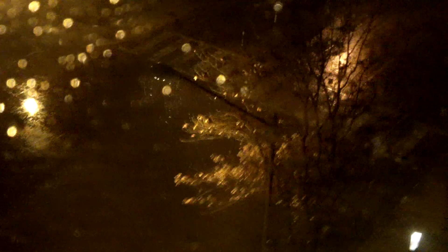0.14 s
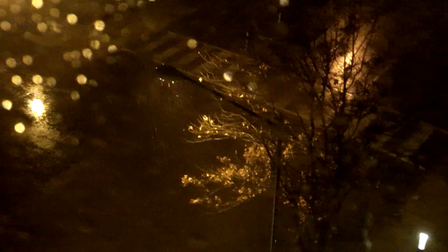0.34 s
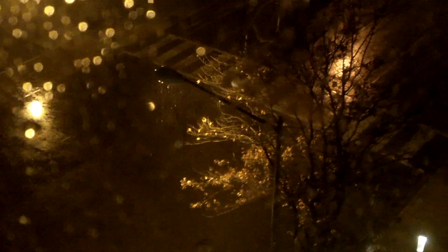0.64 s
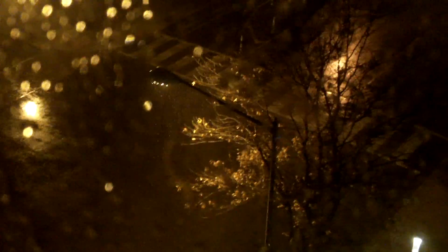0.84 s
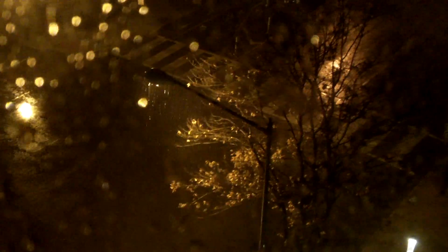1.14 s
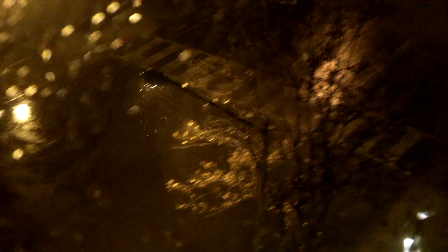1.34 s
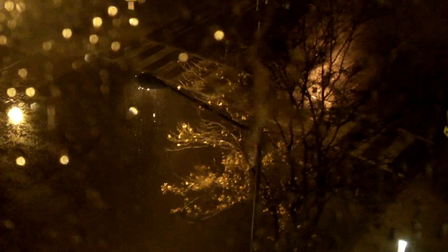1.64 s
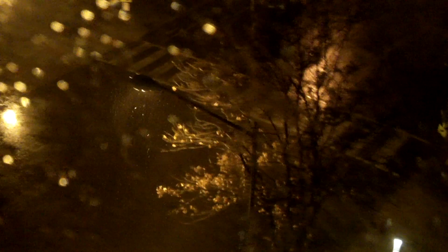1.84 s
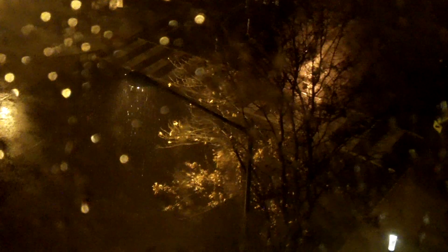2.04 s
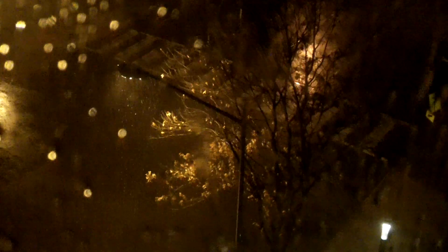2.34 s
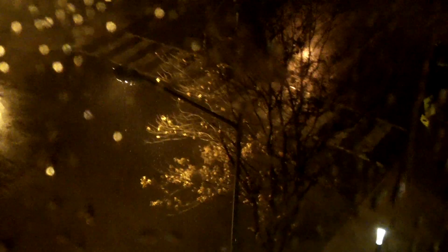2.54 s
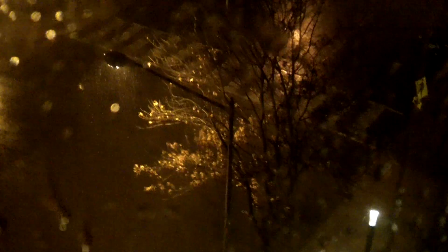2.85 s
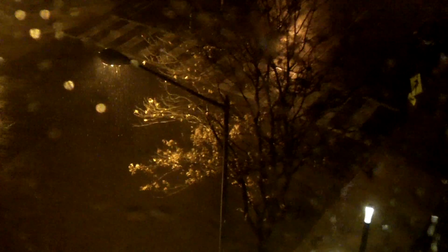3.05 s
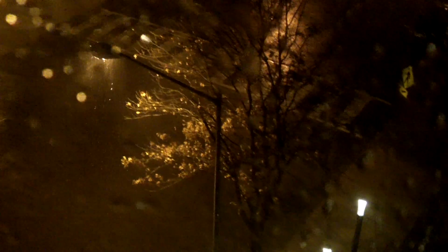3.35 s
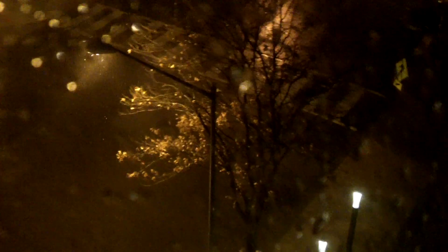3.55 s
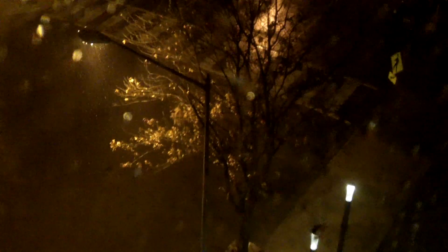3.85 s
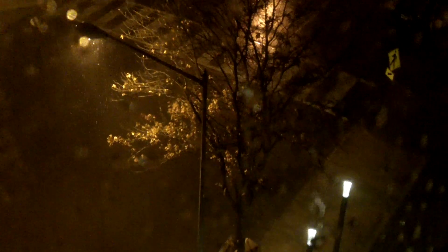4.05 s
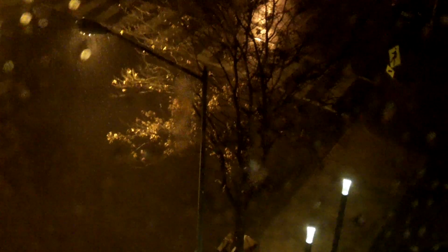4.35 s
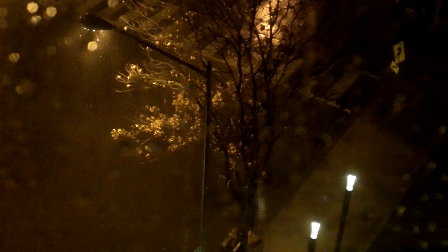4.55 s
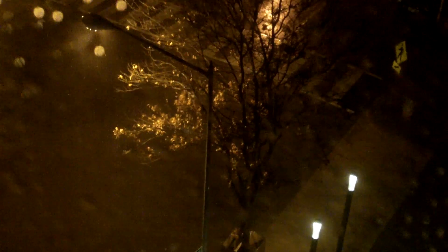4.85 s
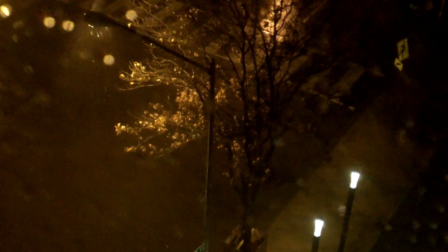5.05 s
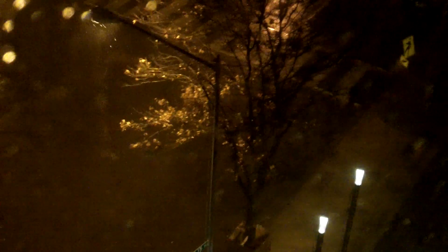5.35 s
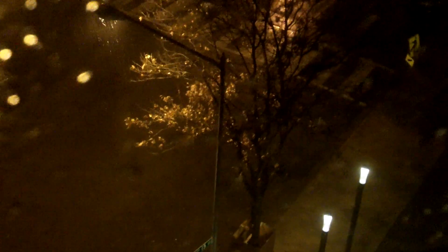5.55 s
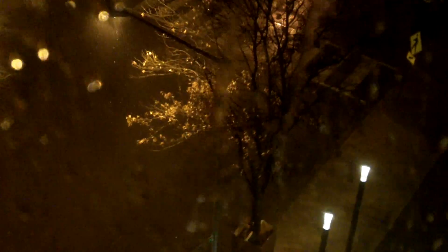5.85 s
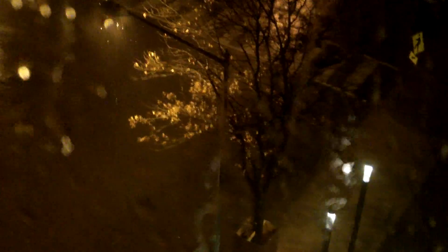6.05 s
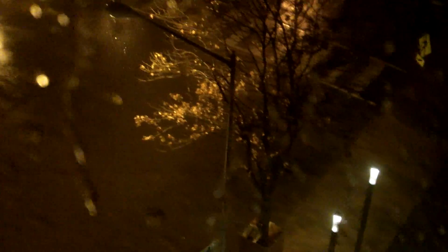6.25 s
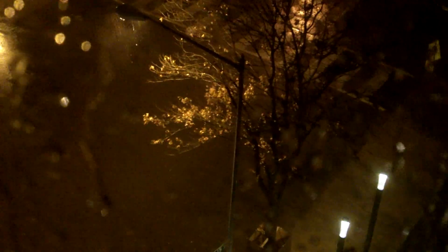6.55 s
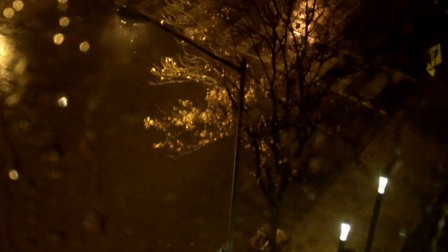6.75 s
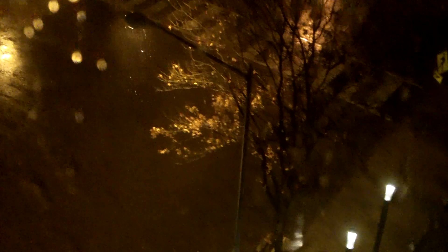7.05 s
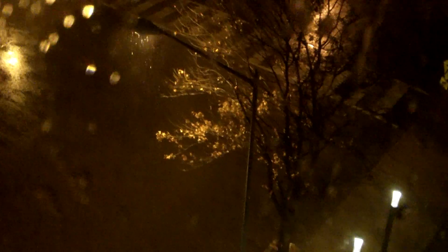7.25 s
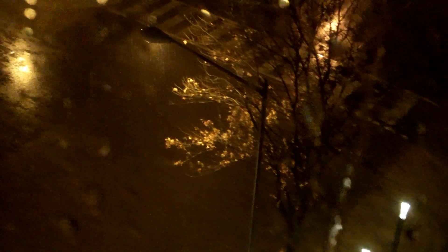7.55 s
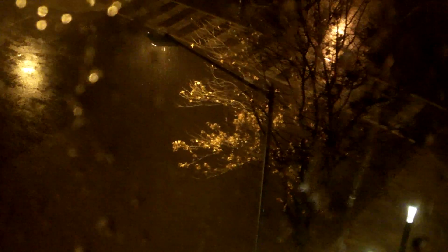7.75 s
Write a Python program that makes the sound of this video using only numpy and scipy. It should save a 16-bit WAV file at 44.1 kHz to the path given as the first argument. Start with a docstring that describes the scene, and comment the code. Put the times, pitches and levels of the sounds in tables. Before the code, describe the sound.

From just inside a closed window above a wet, lamp-lit street, muffled rain keeps pattering without a break. Small quick surges vary its strength, while fat drops tap the pane at uneven intervals and slightly different pitches, quickly damped. A far, low wind swells a little late on, and very quiet hum and hiss sit behind. The close microphone gives a centred image.

```python
"""Rain patters dully on a window at night, heard from indoors close to the glass, with heavier taps among it.
Noise bursts and short tones, filtered by the pane, make the patter; brighter noise makes the fine spray.
Each heavy drop rings damped pane modes and throws a burst of patter. Wind is shaped noise: the pane flexing
below hearing, a rumble in the frame and a far roar. Faint tones waver underneath. One microphone feeds both
channels, with amplifier hiss, low noise and a tone opposite in left and right, and a steady offset."""
import sys
import numpy as np
from scipy import signal
from scipy.fft import rfft, irfft, next_fast_len
from scipy.io import wavfile
from scipy.ndimage import map_coordinates

SR = 44100
rng = np.random.default_rng(int(sys.argv[2]) if len(sys.argv) > 2 else 0)


def wav_record(signal):
    """Record a signal, one row per channel, as 16-bit PCM in the file named by sys.argv[1]."""
    frames = np.transpose(np.atleast_2d(signal))
    bounded = np.clip(frames, -1, 1)
    # unit amplitude maps onto the largest positive 16-bit level
    quanta = np.round(bounded * 32767).astype(np.int16)
    wavfile.write(sys.argv[1], SR, quanta)


N = 348390  # length in samples

# Spectra give relative levels, since each noise is later scaled as a whole.
# Patter strength before flurries and splashes: start_s, level_db
PATTER_LEVEL = [(0.0, -46.5), (0.34, -45.5), (0.52, -47.5), (0.7, -43.0), (0.81, -47), (1.23, -44),
                (1.31, -49), (1.57, -44), (2.17, -48.5), (2.65, -46.0), (2.73, -50.5), (3.01, -46.5),
                (3.11, -49.5), (3.45, -44), (3.94, -48.0), (4.19, -45), (4.66, -49), (4.75, -46),
                (5.53, -48), (5.84, -44.5), (6.38, -48), (6.48, -45), (6.61, -48.5), (6.91, -45.0),
                (7.35, -49.5), (7.46, -45.5), (7.76, -50.5), (7.89, -48.0)]
# Heavy drops, with the nominal level that sets their ring and splash: start_s, level_db, centre_hz
HEAVY_DROPS = [(0.219, -33, 1010), (0.279, -28.5, 807), (1.008, -32.5, 1220), (1.392, -29.5, 1090),
               (1.582, -29.5, 1410), (1.658, -33, 754), (1.809, -30, 961), (1.861, -36, 926),
               (2.192, -31, 762), (2.44, -34, 883), (2.618, -31, 815), (2.842, -36, 1140), (3.01, -31, 920),
               (3.151, -29, 940), (3.404, -34.5, 493), (3.608, -43.5, 912), (3.719, -37.5, 611),
               (4.036, -35, 1100), (4.307, -32, 1210), (4.521, -39, 536), (4.938, -32.5, 1180),
               (5.05, -31.5, 674), (5.388, -36.5, 915), (5.538, -27.5, 549), (5.631, -33.5, 554),
               (5.836, -34, 880), (5.857, -32.5, 1010), (6.049, -32, 1030), (6.287, -30.5, 993),
               (6.799, -36.5, 1010), (7.212, -39, 880), (7.393, -38, 762), (7.452, -32, 606),
               (7.863, -30.5, 1030)]
# Transmission of the pane: frequency_hz, level_db_per_hz
PANE_TRANSMISSION = [(180, -45.5), (300, -8.5), (485, -3.5), (753, -1.5), (865, -2), (1000, 1), (1090, -6),
                     (1220, -4.5), (1330, -7.5), (1540, -4), (2100, -29.5), (2730, -54.5), (4620, -120)]
# Resonant modes of the pane: frequency_hz, width_hz, lift_db
PANE_MODES = [(466, 76, -0.5), (514, 190, 2.5), (645, 50, 2.5), (770, 85, 3), (894, 50, 3), (1026, 26, 3.5),
              (1090, 41, 3.5), (1214, 204, 6), (1389, 100, 4), (1590, 70, 1.5)]
# Spectrum of the fine spray: frequency_hz, level_db_per_hz
SPRAY_SPECTRUM = [(1060, -28.5), (1800, -6.5), (2170, -16), (2760, -19), (3050, -25), (3960, -47.5),
                  (6710, -120)]
# Slow flexing of the pane under gust pressure: start_s, level_db
FLEX_LEVEL = [(0, -52), (.35, -45), (.9, -47), (1.15, -54), (1.6, -41.5), (1.9, -48), (2.3, -45),
              (2.7, -54), (3.2, -50), (4, -50), (4.3, -57), (5.5, -55), (6, -55), (7.9, -57)]
# Spectrum of the flexing: frequency_hz, level_db_per_hz
FLEX_SPECTRUM = [(.7, -18), (3.4, -7), (7.4, 0), (8.7, -2), (11, -10), (14, -22), (25, -70), (60, -150)]
# Wind rumble in the frame, before its random wobble: start_s, level_db
RUMBLE_LEVEL = [(0, -58), (1, -59), (1.7, -57), (2.5, -57.5), (3.5, -59), (4.5, -58), (5.3, -59),
                (6.2, -55.5), (6.8, -58), (7.5, -55.5), (7.9, -57)]
# Spectrum of the rumble: frequency_hz, level_db_per_hz
RUMBLE_SPECTRUM = [(8, -23.5), (13, -3), (24, -1.5), (34, -9), (54, -12.5), (80, -10), (110, -24),
                   (300, -67), (1000, -130)]
# Spectrum of far wind through the wall: frequency_hz, level_db_per_hz
ROAR_SPECTRUM = [(30, -39.5), (70, -2), (105, -4.5), (140, 1), (200, 1), (300, -0.5), (420, -2.5),
                 (800, -52), (2000, -120)]
# Steady tones, alike on both channels: frequency_hz, level_db_rms
HUM_TONES = [(120, -75), (6621, -105), (12710, -103)]
# Spectrum of the amplifier hiss before the band limit: frequency_hz, level_db_per_hz
HISS_SPECTRUM = [(1900, -40), (2100, -8), (3000, -7.5), (3500, -4.5), (3900, -9.5), (4200, -41),
                 (4600, -8.5), (5200, -6), (7000, -2.5), (10000, -1.5), (15000, -0.5)]
# Spectrum of the low noise of opposite sign left and right: frequency_hz, level_db_per_hz
OPPOSITE_SPECTRUM = [(1, -2.5), (18, 4.5), (34, -5.5), (57, -18), (90, -18.5), (130, -31.5), (380, -47.5),
                     (550, -70), (2000, -58), (4000, -110)]
# Constant offset, one row a channel: offset (full scale = 1)
CHANNEL_OFFSET = [
    [.01363],
    [.01646],
]

FLURRY_DB, FLURRIES_PER_S = 0.65, 11  # quick random swings of the rain: depth, knots a second
SPRAY_DB, SPRAY_FOLLOWS = -68, 0.66  # mean level; share of the rain's swings in dB
MODE_DB, RING_S = -11, 0.032  # one mode relative to the drop's level; its 60 dB decay time
SPLASH_DB, SPLASH_RISE_S, SPLASH_DECAY_S = -8.5, 0.004, 0.1  # relative to the drop; rise; 60 dB decay
ROAR_DB, ROAR_FOLLOWS = -59, 0.6  # mean level; share of the rumble table's swings in dB
TOP_HZ = 15000  # upper band limit


def rain():
    """Forced resonance: drop impacts excite the pane; brighter spray shares their rhythm but swings less."""
    patter_db, = curves(PATTER_LEVEL)
    steady_strength = amp(patter_db + FLURRY_DB * wobble(FLURRIES_PER_S))
    strength = np.hypot(steady_strength, splashes())  # powers add
    taps = unit(patter(spread_db=1.2, t60=0.05, wash=1.07, count=1100))
    tones = small_drops(spread_db=1.23, cycles=7.8, count=2400)
    transmission = shape(PANE_TRANSMISSION)
    pane = unit(filtered(taps + amp(-16) * tones, lambda hz: transmission(hz) * pane_resonance(hz)))
    spray = unit(filtered(taps + 0.49 * rng.standard_normal(N), shape(SPRAY_SPECTRUM)))
    spray_strength = amp(SPRAY_DB) * unit(strength ** SPRAY_FOLLOWS)
    return strength * pane + spray_strength * spray


def pane_resonance(hz):
    """Resonance: each mode lifts the response around its own frequency; the lifts add in dB."""
    return amp(sum(lift_db / (1 + (2 * (hz - mode_hz) / width_hz) ** 2)
                   for mode_hz, width_hz, lift_db in PANE_MODES))


def patter(spread_db, t60, wash, count):
    """Shot noise: small drops start short bursts of noise, over the steady wash of those far away."""
    when, size = rng.random((count, 2)).T
    hit_energy = amp(-spread_db * np.log(1 - size)) ** 2
    hits = np.bincount((when * N).astype(int), hit_energy, N)
    t = np.arange(SR // 8) / SR
    burst = amp(-120 * t / t60) * (1 - np.exp(-t / 0.0024))  # energy falls 60 dB in t60
    energy = np.abs(signal.fftconvolve(hits, burst)[:N])
    return np.sqrt(energy / energy.mean() + wash) * rng.standard_normal(N)


def small_drops(spread_db, cycles, count):
    """Damped oscillation: scattered drops sound short tones at the pitch of the spot where they land."""
    when, size, spot = rng.random((count, 3)).T
    hz = 300 + 1900 * spot
    level_db = -spread_db * np.log(1 - size)
    return unit(rings(when * N / SR, level_db, hz, cycles / hz + 0.025, size=1024))


def splashes():
    """Impulse response: each heavy drop adds a rising, then decaying burst to the patter's amplitude."""
    start_s, level_db, _ = np.transpose(HEAVY_DROPS)
    t = np.arange(SR // 4) / SR
    hits = np.bincount((start_s * SR).astype(int), amp(level_db + SPLASH_DB), N)
    burst = amp(-60 * t / SPLASH_DECAY_S) * (1 - np.exp(-t / SPLASH_RISE_S))
    return np.abs(signal.fftconvolve(hits, burst)[:N])


def big_drops():
    """Modal excitation: a heavy drop rings mostly the modes near the centre set by where it lands."""
    start_s, level_db, centre_hz = np.repeat(HEAVY_DROPS, len(PANE_MODES), axis=0).T
    hz = np.tile(np.transpose(PANE_MODES)[0], len(HEAVY_DROPS))
    level, late, detune = rng.standard_normal((len(start_s), 3)).T  # random for each mode of each drop
    away_db = -14 * np.log2(hz / centre_hz) ** 2  # distance from the centre in octaves
    mode_db = level_db + MODE_DB + away_db + 2 * level
    mode_start_s = start_s + 0.000984 * abs(late)
    return rings(mode_start_s, mode_db, hz * (1 + 0.025 * detune), np.full(len(start_s), RING_S))


def wind():
    """Turbulent forcing: gust pressure flexes the pane and rumbles in the frame; a far roar swells with it."""
    flex_db, = curves(FLEX_LEVEL)
    rumble_db, = curves(RUMBLE_LEVEL)
    rumble = amp(rumble_db + 0.8 * wobble(6)) * noise(RUMBLE_SPECTRUM)[0]
    rumble_swing_db = rumble_db - rumble_db.mean()
    roar_db = ROAR_DB + ROAR_FOLLOWS * rumble_swing_db + 0.74 * wobble(1.7)
    flex = amp(flex_db) * noise(FLEX_SPECTRUM)[0]
    roar = amp(roar_db) * noise(ROAR_SPECTRUM)[0]
    return flex + rumble + roar


def hum():
    """Phase modulation: faint steady sines waver a little in phase."""
    t = np.arange(N) / SR
    return sum(np.sqrt(2) * amp(db) * np.sin(2 * np.pi * hz * t + 0.21 * wobble(3)) for hz, db in HUM_TONES)


def rings(s, db, hz, t60, size=2048):
    """Superposition: exponentially damped sines with a soft start, one for each row, add together."""
    t = np.arange(size) / SR
    decay = amp(db[:, None] - 60 * t / t60[:, None])
    soft_start = 1 - np.exp(-(t / 0.00065) ** 2)
    tones = decay * np.sin(2 * np.pi * hz[:, None] * t) * soft_start
    at = np.round(s * SR).astype(int)[:, None] + np.arange(size)
    return np.bincount(at.ravel(), tones.ravel(), N + size)[:N]


def noise(points, channels=1):
    """Spectral shaping: filtered white noise, scaled to rms 1 over all channels."""
    return unit(filtered(rng.standard_normal((channels, N)), shape(points)))


def shape(points):
    """Frequency response: gain of (Hz, dB) points joined on a log frequency axis."""
    f, db = np.transpose(points)
    return lambda hz: amp(np.interp(np.log(hz + 0.13), np.log(f + 0.1), db))


def filtered(x, response):
    """Linear filtering: the spectrum of x times a response of frequency."""
    m = next_fast_len(N + SR)  # padding against wrap-around
    return irfft(rfft(x, m) * response(np.fft.rfftfreq(m, 1 / SR)), m)[..., :N]


def wobble(rate):
    """Band-limited fluctuation: a smooth curve through random knots, rate knots a second."""
    knots = rng.standard_normal(int(N * rate / SR) + 4)
    return map_coordinates(knots, [np.arange(N) * rate / SR])


def curves(rows):
    """Linear interpolation: one value per sample for each column after the time."""
    s, *cols = np.transpose(rows)
    return [np.interp(np.arange(N) / SR, s, c) for c in cols]


def unit(x):
    """Normalization: x at rms 1."""
    return x / np.sqrt(np.mean(x ** 2) + 1e-20)


def amp(db):
    """Decibel law: amplitude gain of a level in dB."""
    return 10 ** (np.asarray(db) / 20)


def scene():
    """Superposition: all sources add to one sound field, the same on both channels."""
    return np.tile(rain() + big_drops() + wind() + hum(), (2, 1))


def record(dry):
    """Sum and difference: common and opposite noise are added, then a band limit and an offset."""
    common_hiss, opposite_hiss = amp([[-77.7], [-79.8]]) * noise(HISS_SPECTRUM, channels=2)
    low_noise = amp(-73.5) * noise(OPPOSITE_SPECTRUM)[0]
    low_tone = amp(-71.0) * np.sin(2 * np.pi * 47 * np.arange(N) / SR)
    side = opposite_hiss + low_noise + low_tone  # opposite sign left and right
    return filtered(dry + common_hiss + [side, -side], lambda hz: hz < TOP_HZ) + CHANNEL_OFFSET


dry = scene()
out = record(dry)
wav_record(out)
```